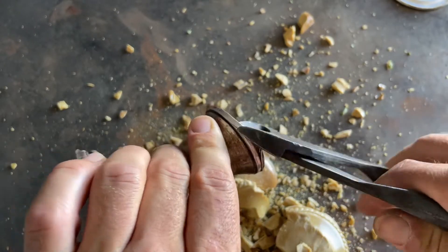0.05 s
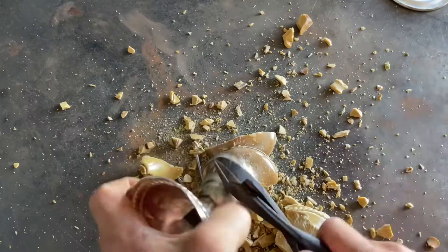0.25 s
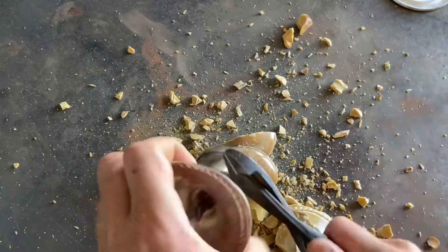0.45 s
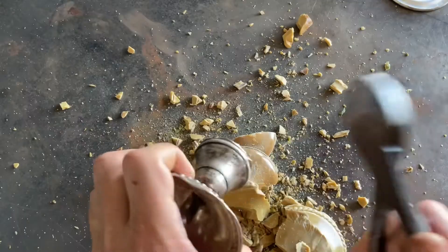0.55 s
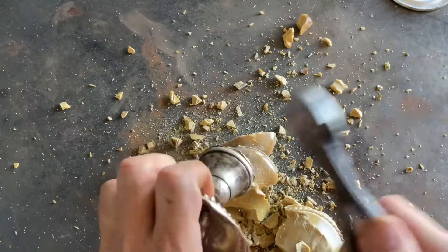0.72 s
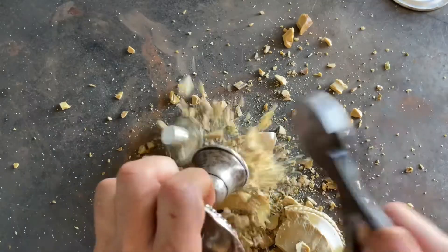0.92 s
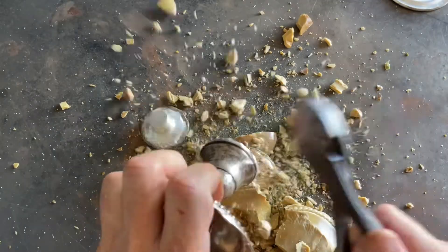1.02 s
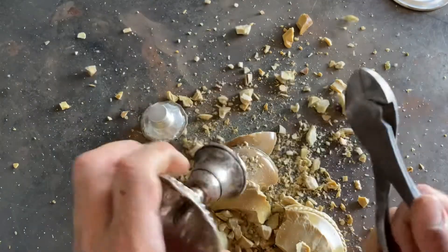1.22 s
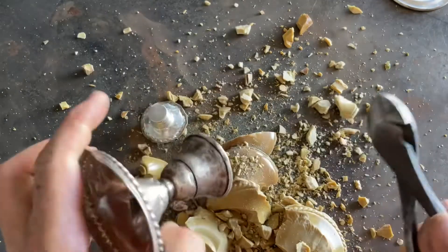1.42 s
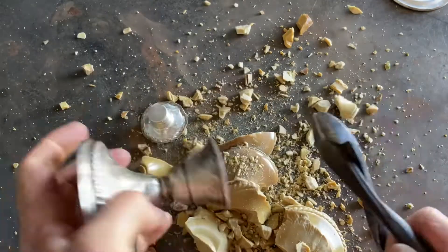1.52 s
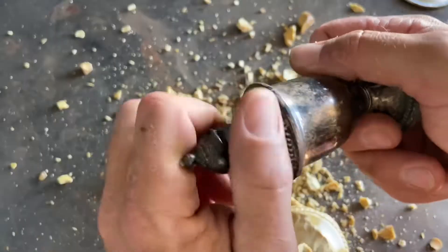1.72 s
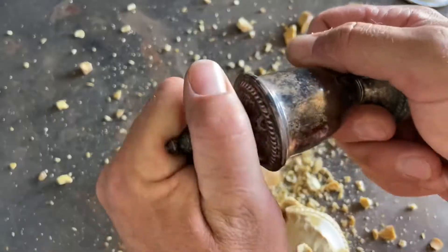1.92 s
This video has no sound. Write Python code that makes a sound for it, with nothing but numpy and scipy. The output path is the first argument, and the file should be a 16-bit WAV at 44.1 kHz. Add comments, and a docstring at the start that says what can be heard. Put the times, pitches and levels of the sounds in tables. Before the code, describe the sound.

Four quick, sharp blows of steel on filled silver sound close by in a small room, knocking against a workbench. Then brittle filler snaps, a little metal cap bounces with a ring, grains scatter, and hands softly shift the pieces.

```python
"""In a small room, over a workbench, a steel tool hits a hand-held, filled silver piece four times.
Each blow is a sharp crack, a short ring and a dull knock, with a thud from the bench below.
The last blow breaks the filler: a small silver cap drops off and bounces, ringing, as crumbs patter down.
Hands then shift the pieces with small clicks and rubs, over a low room rumble and an electric hum."""
import sys
import numpy as np
from scipy import signal
from scipy.fft import rfft, irfft
from scipy.io import wavfile

SR = 44100
rng = np.random.default_rng(int(sys.argv[2]) if len(sys.argv) > 2 else 0)


def generate_wav(signal):
    """Clip the signal to [-1, 1] and save it as 16-bit WAV at the path in sys.argv[1]."""
    frames = np.transpose(np.atleast_2d(signal))
    scaled = np.clip(frames, -1, 1) * 32767
    pcm = np.round(scaled).astype(np.int16)
    wavfile.write(sys.argv[1], SR, pcm)


N = 85995

# A t60 is the time a sound takes to fade by 60 dB. Levels are relative. A tilt above 0 adds treble.
# The blows: t/s, knock level/dB, knock pitch factor, knock tilt/(dB per octave), thud level/dB,
# crack level/dB, crack tilt/(dB per octave), tones of the spot that is hit (f/Hz, level/dB)
BLOWS = [(0.2250, -6.5, 0.95, 2.5, -32, -2.6, -2.5, [(1720, -13.5), (2316, -17), (5350, -24)]),
         (0.4279, -8.5, 0.92, -4.5, -27, -0.83, 1.3, [(2820, -20), (3314, -16), (4060, -21.5)]),
         (0.6235, -8.5, 0.97, -4.5, -30.5, -0.33, 0.15, [(2080, -19), (2380, -14), (5480, -16.5)]),
         (0.8153, -24.5, 0.85, -6, -57.5, -1.8, 6, [(2480, -24), (4254, -15), (4620, -24.5)])]
# Tones of the filled silver piece and of the bench: f/Hz, level/dB, t60/s
KNOCK_TONES = [(588.3, -21.5, 0.045), (892, -7.5, 0.015), (1208, -6.5, 0.026), (1386, -5, 0.031),
               (1581, -2.5, 0.024)]
BENCH_TONES = [(139, -4, 0.042), (244.4, -0.5, 0.029), (346, -2, 0.05), (481.2, -4.5, 0.037)]
# Tones of the loose cap: f/Hz, level/dB, t60/s
CAP_TONES = [(2492, -1, 0.3), (2713, -19, 0.55), (2832, -20, 0.7), (3153, -17, .14), (3208, -11.5, .13),
             (4235, -19, 0.2), (4852, -16, 0.15), (5290, -20, .2), (5651, -17, 0.4), (5830, -20, .35),
             (5970, -16, .12), (6282, -21, .16), (6773, -20, .4), (7840, -23, 0.25), (8586, -32, .4),
             (14460, -38, .15)]
# The cap's landings: t/s, ring level/dB, pressed flat (0 or 1), overtone level/dB,
# free ringing time/s, t60/s of the damping after that, tick level/dB
BOUNCES = [(0.8160, -23.5, 0, -3, 0.01, 0.089, -12), (0.8396, -19, 0, 2, 0.012, 0.028, -2.5),
           (0.8581, -13, 0, -1.5, 0.05, 0.12, -5.5), (0.9430, -36, 0, -4.5, 0.027, 0.031, -16),
           (0.9846, -26.5, 0, 0.5, 0.0079, 0.28, -19.5), (1.0009, -22, 1, -13, 0.006, 0.011, -15.5),
           (1.021, -24.5, 0, -6, 0.012, 0.088, -21.5), (1.0736, -36, 0, -15, 0.0022, 0.045, -47),
           (1.0877, -34, 1, -3, 0.0024, 0.032, -26)]
# Lumps of filler and touches of metal: t/s, level/dB, middle f/Hz, width/octaves, t60/s
CLICKS = [(0.014, -29, 1234, 0.2, 0.03), (0.068, -28, 6600, 0.69, 0.0087), (0.117, -36, 1600, .4, 0.049),
          (0.118, -41, 6200, 0.44, 0.035), (1.093, -19.5, 6800, 0.11, 0.072),
          (1.143, -19, 4200, 0.94, 0.15), (1.204, -25.5, 1554, 0.18, 0.07), (1.244, -24, 5840, 0.81, 0.011),
          (1.277, -31.5, 2605, 0.72, 0.036), (1.3637, -26.5, 8000, 0.96, 0.045),
          (1.45, -34, 3970, 0.15, 0.068), (1.449, -41, 1872, .04, 0.088),
          (1.5360, -33.5, 1551, 0.14, 0.034), (1.5934, -23.5, 3490, 0.57, 0.16),
          (1.595, -26, 898, 1.26, 0.16)]
# The colour of each noise, meaning how strong it is from low to high: f/Hz, level/dB
CRACK_COLOUR = [(100, -29), (700, -7.5), (1800, 3.5), (2600, 0.5), (4000, -2.5), (6000, 0), (8800, 4),
                (11500, -10), (13500, -8.5), (15300, -8), (17000, -25.5)]  # steel on silver
TICK_COLOUR = [(100, -7.5), (600, -9.5), (2000, 4), (4000, -13), (7000, -10), (11000, -12.5),
               (16000, -21.5)]  # the cap meeting the bench
SHIMMER_COLOUR = [(1000, -27), (2300, -3), (4000, -10.5), (5700, -1.5), (8000, -3), (10000, -25),
                  (12500, -27.5), (16000, -30)]  # the cap's many crowded overtones
CRUMB_COLOUR = [(150, -2.5), (500, 2.5), (1200, -4), (2200, 1.5), (4000, -4), (6500, -4), (8200, -10.5),
                (10000, -29), (16000, -32.5)]  # grains of filler
RUB_COLOUR = [(100, -8.5), (400, 8.5), (1200, 0), (2500, -8.5), (4000, -4.5), (6000, -2.5), (9000, -15),
              (15000, -19.5)]  # skin sliding on silver
RUMBLE_COLOUR = [(20, -37), (35, -9), (50, -12), (82, 2.5), (105, -0.5), (145, 0), (175, -13), (400, -24.5),
                 (800, -33.5), (2000, -50), (16000, -66.5)]  # the room's background
TAIL_COLOUR = [(100, -9.5), (500, -15), (1400, -17.5), (2100, -10), (3000, -9), (6000, -14.5), (8200, -27),
               (10000, -29), (16000, -30.5)]  # the tail, the sound that lingers in the room
# How loud the rub and the rumble are over time: t/s, level/dB
RUB_LEVEL = [(0, -59.5), (.12, -70.5), (.19, -69.5), (1.299, -68.5), (1.667, -78), (1.70, -64.5),
             (1.765, -65), (1.821, -76), (1.95, -79)]
RUMBLE_LEVEL = [(0, -47.5), (.11, -45), (0.174, -48), (0.199, -98), (.225, -57.5), (1.0, -53.5),
                (1.62, -58.5), (1.668, -57), (1.71, -47), (1.95, -47.5)]
# Brief dips in the whole sound: t/s, level/dB
DIPS = [(0.196, -15), (1.667, -20.5)]
# Echoes from nearby and from the far walls: delay/s, gain
NEAR_ECHOES = [(.0041, 0.13), (.0083, 0.081), (0.0199, .045), (0.0252, 0.04)]
WALL_ECHOES = [(.0655, .036), (.0715, .026), (.084, 0.01)]
# How long the tail lasts: f/Hz, t60/s
TAIL_T60 = [(100, 0.19), (500, 0.57), (1500, 0.66), (3000, 0.64), (7500, 0.55), (10000, 0.15), (16000, .22)]
# How alike the tail is on the left and right: f/Hz, likeness (0 to 1)
TAIL_LIKENESS = [(100, 0.24), (500, 0.51), (1500, 0.58), (3000, 0.14), (8000, .1)]
# How far the left microphone runs ahead of the right: f/Hz, phase/radians
MIC_PHASE = [(150, 0), (280, -.55), (500, -.3), (1000, -.2), (1720, .1), (3190, .6), (4130, .25),
             (4820, .3), (5340, 1), (8350, 2.6), (10200, 3.1), (13000, 3.2), (15000, 3.7), (16500, 3.8)]
# How much louder the left microphone is: f/Hz, level/dB
MIC_BALANCE = [(100, -1), (700, 1.6), (1400, 2.1), (2500, -3), (5000, 0), (12000, -0.47)]

T = np.arange(SR // 2) / SR  # seconds within one short sound
SCENE_T = np.arange(N) / SR  # seconds within the scene


def blows(ring_db, ring_t60=.026, bench_lag_s=0.00062):
    """Steel hits silver: the spot cracks and rings briefly, the filled body knocks, the bench thuds."""
    out, hz = np.zeros(N), bins(len(T))
    crack_shape = rise(0.0003) * (fade(0.011) + amp(-18) * fade(0.097))  # a snap, then a faint buzz
    for s, knock_db, pitch, knock_tilt, thud_db, crack_db, crack_tilt, spot_tones in BLOWS:
        colour = read(CRACK_COLOUR, hz) + crack_tilt * np.log2((hz + 100) / 4000)
        add(out, s, amp(8 + crack_db) * burst(colour, crack_shape))
        # (-1) ** k makes every other tone start its swing the opposite way
        ring = sum((-1) ** k * tone(f, db, ring_t60) for k, (f, db) in enumerate(spot_tones))
        add(out, s, amp(ring_db) * ring)
        knock = -sum((-1) ** k * tone(f * pitch, db + knock_db + knock_tilt * np.log2(f / 1300), t60)
                     for k, (f, db, t60) in enumerate(KNOCK_TONES))
        add(out, s, low_cut(knock * rise(0.0018), hz=500))
        thud = sum(tone(f, db + thud_db, t60) for f, db, t60 in BENCH_TONES)
        add(out, s + bench_lag_s, low_cut(thud * rise(0.0013), hz=90))
    return out


def bouncing_cap(lowest_tone_db):
    """At each landing the cap ticks, then rings freely until the bench damps it."""
    out, hz = np.zeros(N), bins(len(T))
    for s, ring_db, pressed, overtone_db, free_s, damped_t60, tick_db in BOUNCES:
        pitch = .92 if pressed else 1
        tones = sum(tone(f * pitch, db + (overtone_db if k else lowest_tone_db), t60)
                    for k, (f, db, t60) in enumerate(CAP_TONES))
        shimmer = amp(15 + overtone_db) * burst(read(SHIMMER_COLOUR, hz), fade(0.12))
        shape = rise(.0005) * fade(damped_t60, np.maximum(T - free_s, 0))
        tick = amp(tick_db) * burst(read(TICK_COLOUR, hz), fade(0.039))
        add(out, s, amp(ring_db) * (tones + shimmer) * shape + tick)
    return out


def breaking_filler(start_s=.834, length_s=.026, count=9):
    """The filler splits in a quick run of bright snaps."""
    out = np.zeros(N)
    for k, wait in enumerate(rng.random(count)):
        snap = burst(band(hz=10000, octaves=0.3), fade(0.0064))
        add(out, start_s + length_s * (k + wait) / count, amp(-2) * snap)
    return out


def crumbs(start_s=.84, length_s=0.37, count=360, low_hz=1800, high_hz=6500, fade_db_per_s=43.5):
    """Grains of filler shower down ever more softly, each with a slightly different colour."""
    out, shared_colour = np.zeros(N), read(CRUMB_COLOUR, bins(len(T)))
    for k, (wait, size, pitch) in enumerate(rng.random((count, 3))):
        delay = length_s * (k + wait) / count
        hz = low_hz * (high_hz / low_hz) ** pitch
        db = -23.5 + 2.5 * (2 * size - 1) - fade_db_per_s * delay
        own_colour = np.maximum(0.86 * band(hz, octaves=0.28), -7)
        add(out, start_s + delay, amp(db) * burst(shared_colour + own_colour, fade(0.025)))
    return out


def clicks():
    """Single lumps land and metal is touched, each making a short puff of noise."""
    out = np.zeros(N)
    for s, db, hz, octaves, t60 in CLICKS:
        add(out, s, amp(db) * burst(band(hz, octaves), fade(t60)))
    return out


def hand_rub():
    """Skin slides on silver with a soft hiss."""
    return long_noise(RUB_COLOUR, RUB_LEVEL, stereo_width=0.6)


def hand_bump(start_s=.14, length_s=.055, hz=73.3, db=-43.5):
    """A hand settles on the bench with a soft, low push."""
    out = np.zeros(N)
    swell = np.sin(np.pi * rise(length_s))
    add(out, start_s, amp(db) * swell * np.sin(2 * np.pi * hz * T))
    return out


def room_rumble():
    """The room rumbles low, almost the same on both sides."""
    return long_noise(RUMBLE_COLOUR, RUMBLE_LEVEL, stereo_width=.02)


def mains_hum(hz=118.9, db=-56.5):
    """The electric supply hums on one steady, low tone."""
    return amp(db) * np.sin(2 * np.pi * hz * SCENE_T)


def room(direct, to_walls, wall_cut_hz=4500, tail_count=3, turn_s=.2):
    """The direct sound gets quick echoes; what reaches the walls returns as dull echoes and a tail."""
    out = direct.copy()
    for s, gain in NEAR_ECHOES:
        add(out, s, gain * direct)
    dull = signal.sosfilt(signal.butter(2, wall_cut_hz, fs=SR, output="sos"), to_walls)
    for s, gain in WALL_ECHOES:
        add(out, s, gain * dull)
    turn = (SCENE_T // turn_s) % tail_count  # tails take turns, so each blow differs from the one before
    tails = sum(signal.fftconvolve((to_walls * (turn == k))[None], room_tail(), axes=1)[:, :N]
                for k in range(tail_count))
    return out + tails


def room_tail():
    """Countless echoes blur into a stereo wash whose treble and deep bass die first."""
    hz, t, (left, other) = signal.stft(rng.standard_normal((2, len(T) * 2)), SR, nperseg=256)
    likeness, t60 = read(TAIL_LIKENESS, hz)[:, None], read(TAIL_T60, hz)[:, None]
    right = likeness * left + np.sqrt(1 - likeness ** 2) * other
    even_energy = np.sqrt(2 * np.log(1000) / (t60 * SR))  # turns the longer fades down
    shape = fade(t60, t) * even_energy * rise(0.014, t)
    colour = amp(read(TAIL_COLOUR, hz))[:, None]
    return signal.istft(np.array([left, right]) * shape * colour, SR, nperseg=256)[1]


def dips(width_s=0.0075):
    """A volume curve that dips briefly twice."""
    return amp(sum(db * np.exp(-((SCENE_T - s) / width_s) ** 2) for s, db in DIPS))


def amp(db):
    """Turns decibels into a number to multiply by."""
    return 10 ** (np.asarray(db) / 20)


def rise(seconds, t=T):
    """Climbs from 0 to 1 in the given time, then stays there."""
    return np.minimum(t / seconds, 1)


def fade(t60, t=T):
    """Falls by 60 dB every t60 seconds."""
    return np.exp(-np.log(1000) * t / np.maximum(t60, 1e-4))


def tone(hz, db, t60):
    """One pure tone that dies away."""
    return amp(db) * fade(t60) * np.sin(2 * np.pi * hz * T)


def read(table, hz):
    """Finds values between a table's rows, with frequencies spaced like musical pitch."""
    f, value = np.transpose(table)
    return np.interp(np.log(hz + 1), np.log(f + 1), value)


def bins(size):
    """The frequencies that make up a sound this many samples long."""
    return np.fft.rfftfreq(size, 1 / SR)


def band(hz, octaves):
    """A colour, in dB, that is strongest around one frequency."""
    return -10 * np.log10(1 + (np.log2((bins(len(T)) + 1) / hz) / octaves) ** 4)


def noise(colour_db):
    """Noise of the given colour, with an average strength (rms) of 1."""
    x = irfft(amp(colour_db) * np.exp(2j * np.pi * rng.random(len(colour_db))))
    return x / x.std()


def burst(colour_db, shape):
    """A puff of noise that follows a volume shape, with a total energy of 1."""
    x = noise(colour_db) * shape
    return x / np.linalg.norm(x)


def long_noise(colour, levels, stereo_width):
    """Stereo noise that follows a level curve through the whole scene."""
    middle, side = (noise(read(colour, bins(N + 1)))[:N] for _ in range(2))
    volume = amp(np.interp(SCENE_T, *np.transpose(levels)))
    return np.array([middle + stereo_width * side, middle - stereo_width * side]) * volume


def low_cut(x, hz):
    """Thins out the sound below hz."""
    return signal.sosfilt(signal.butter(2, hz, "high", fs=SR, output="sos"), x)


def add(mix, s, sound):
    """Mixes a sound in, starting at s seconds."""
    part = mix[max(round(s * SR), 0):][:len(sound)]
    part += sound[:len(part)]


def scene():
    """The work in its room, over the background; pure rings reach the walls less than noise does."""
    background = room_rumble() + hand_rub() + mains_hum() + hand_bump()
    debris = clicks() + crumbs()
    to_walls = blows(ring_db=-8) + amp(3) * bouncing_cap(lowest_tone_db=-17) + debris
    direct = blows(ring_db=0) + bouncing_cap(lowest_tone_db=0) + breaking_filler() + debris
    return dips() * (background + room(direct, to_walls))


def record(dry):
    """Two microphones hear with slightly different timing and level; treble above 16500 Hz is cut."""
    hz = bins(2 * N)
    left = amp(read(MIC_BALANCE, hz) / 2) * np.exp(.5j * read(MIC_PHASE, hz))
    pair = irfft(rfft(dry, 2 * N) * np.array([left, 1 / left]))[:, :N]
    treble_cut = signal.firwin(255, 16500, window=("kaiser", 9), fs=SR)
    return signal.oaconvolve(pair, treble_cut[None], "same")


dry = scene()
out = record(dry)
generate_wav(out)
```